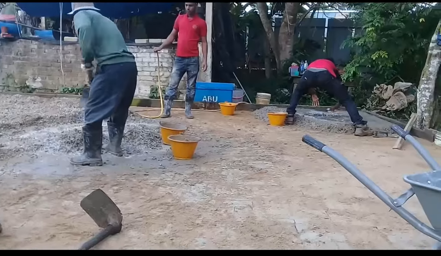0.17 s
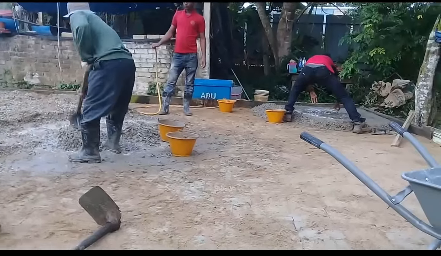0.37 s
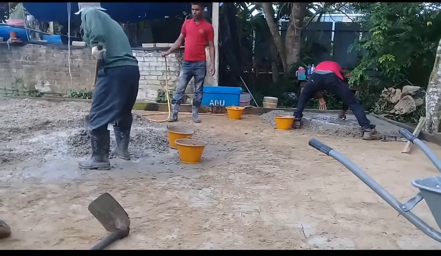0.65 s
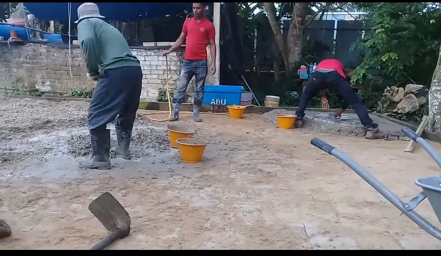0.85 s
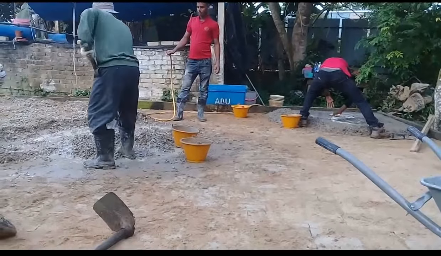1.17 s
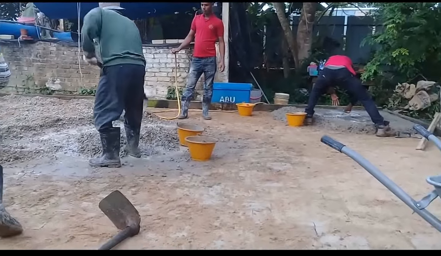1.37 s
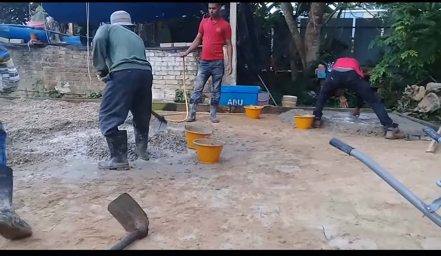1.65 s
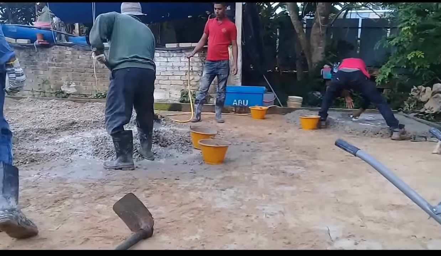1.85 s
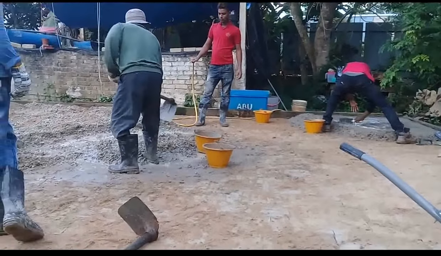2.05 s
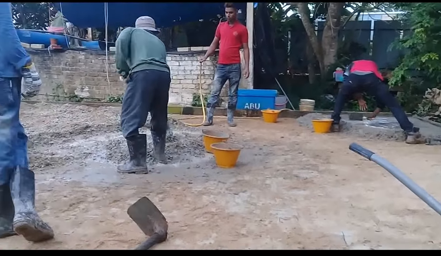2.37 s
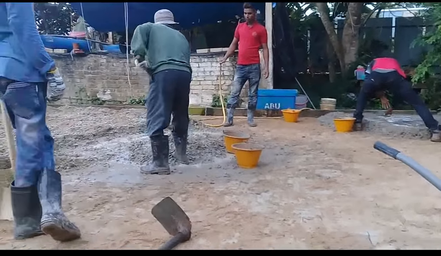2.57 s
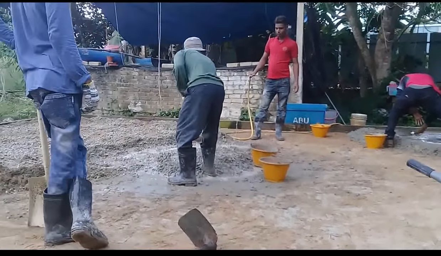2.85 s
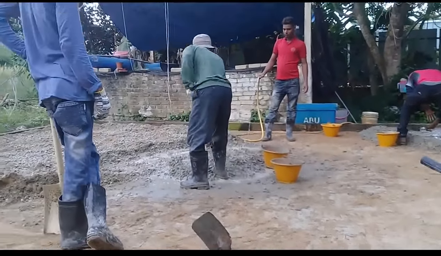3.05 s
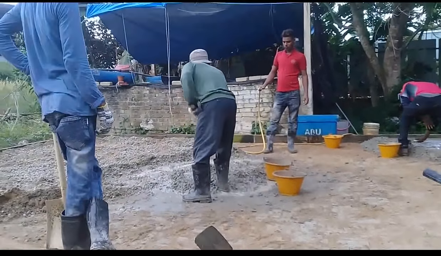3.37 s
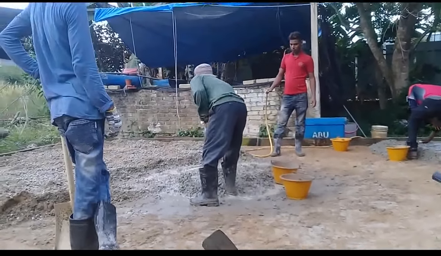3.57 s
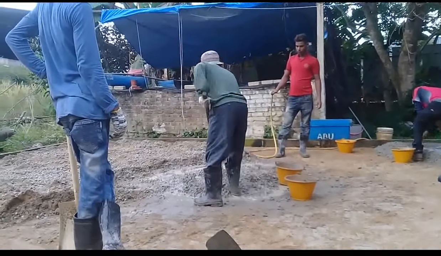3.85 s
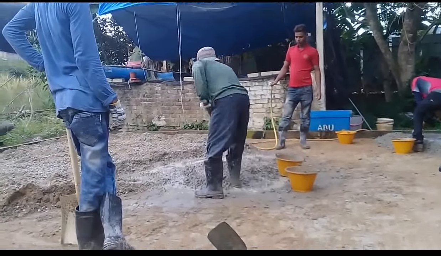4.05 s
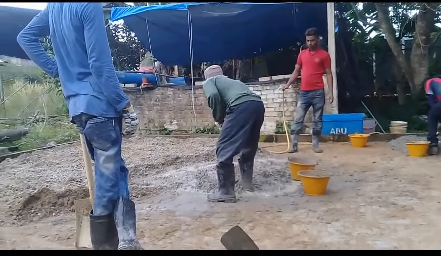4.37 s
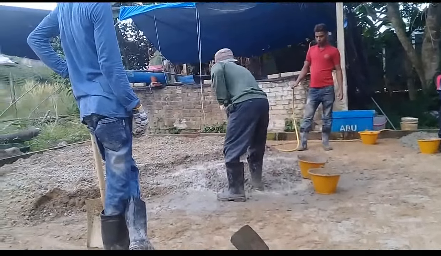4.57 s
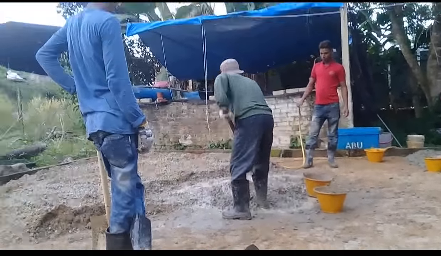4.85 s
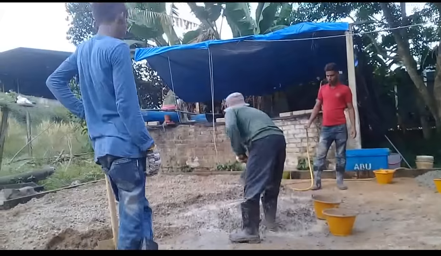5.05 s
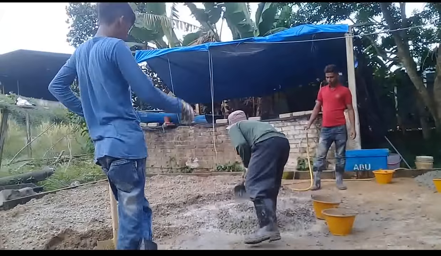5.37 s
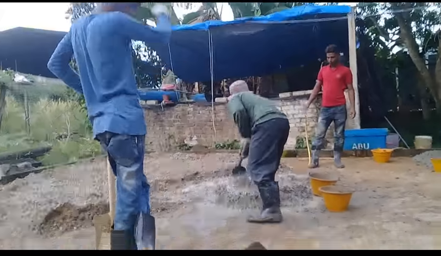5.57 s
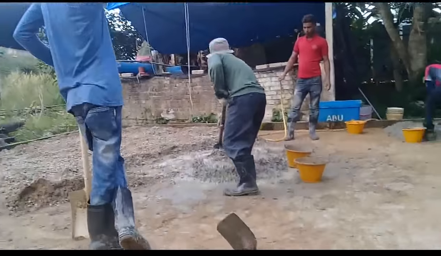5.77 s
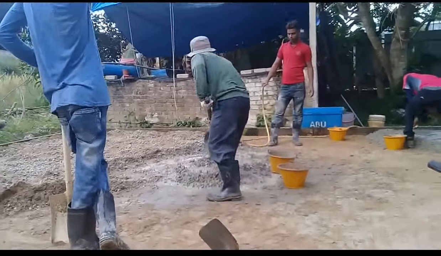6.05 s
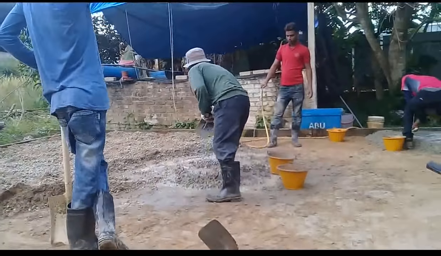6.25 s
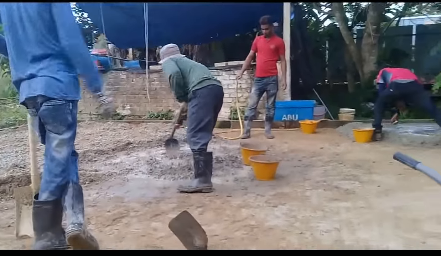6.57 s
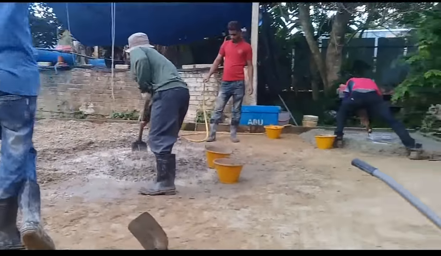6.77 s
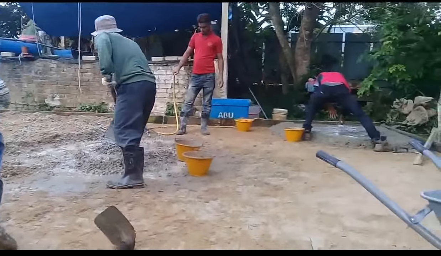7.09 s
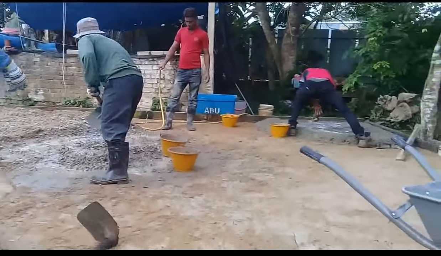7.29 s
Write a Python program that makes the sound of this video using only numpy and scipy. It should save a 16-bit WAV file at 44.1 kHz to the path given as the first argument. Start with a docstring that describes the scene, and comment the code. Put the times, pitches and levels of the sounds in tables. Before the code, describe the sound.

Repeated shovel strokes crunch, rasp and clink through a wet gravel and cement mix over a low outdoor rumble.

```python
"""Shovelling wet gravel in a yard

A labourer turns gravel and cement on a slab, a few metres from the microphone. The steel shovel chops
into the heap, crushes and pushes stones, then drags back with the bare blade rasping and clinking.
The open yard answers briefly; a low outdoor rumble lies underneath."""
import sys
import numpy as np
from scipy import signal
from scipy.fft import rfft, irfft, next_fast_len
from scipy.io import wavfile
from scipy.ndimage import uniform_filter1d

SR = 44100
rng = np.random.default_rng(int(sys.argv[2]) if len(sys.argv) > 2 else 0)


def unload_wav(signal):
    """Save mono or channel-first audio to the path in sys.argv[1] as 16-bit WAV at rate SR, clipped to [-1, 1]."""
    wavfile.write(
        sys.argv[1],
        SR,
        np.round(np.clip(np.atleast_2d(signal).T, -1, 1) * 32767).astype(np.int16),
    )


N = 327222
T = np.arange(N) / SR


def amp(db):
    """Decibels to gain."""
    return 10 ** (np.asarray(db) / 20)


def unit(x):
    """Scale to rms 1."""
    return x / np.sqrt(np.mean(x ** 2) + 1e-18)


def colour(x, points):
    """Filter with a smooth (Hz, dB) response."""
    hz, db = np.transpose(points)
    size = next_fast_len(len(x) + SR // 10)
    bins_hz = np.arange(size // 2 + 1) * SR / size
    response = amp(np.interp(np.log(bins_hz + 1), np.log(hz), db))
    return irfft(rfft(x, size) * response, size)[:len(x)]


def band_rms(x, band_hz):
    """Strength of x between two frequencies."""
    return np.std(signal.sosfilt(signal.butter(4, band_hz, "band", fs=SR, output="sos"), x))


def highpass(x, hz):
    """Roll off the bass below hz."""
    return signal.sosfilt(signal.butter(2, hz, "high", fs=SR, output="sos"), x)


def add(out, start, sound):
    """Mix a sound in at a start time in seconds."""
    i = int(start * SR)
    out[i:i + len(sound)] += sound[:max(N - i, 0)]


def ringing(hz, t60, t):
    """One decaying mode."""
    return np.sin(2 * np.pi * hz * t) * np.exp(-np.log(1000) * t / t60)


def clicks(rate, spread_db):
    """Random contacts, rate a second: many faint, a few strong."""
    chance, size, side = rng.random((3, N))
    strength = np.minimum(-np.log(size + 1e-12), 5)
    return (chance < rate / SR) * np.sign(side - .5) * amp(spread_db * strength)


def wander(rate_hz):
    """Smooth random drift with rms 1."""
    hold = max(int(SR / rate_hz), 1)
    steps = rng.standard_normal(N)[np.arange(N) // hold]
    return unit(uniform_filter1d(steps, hold))


# The open air around the yard. Each row: frequency in Hz, relative level in dB.
RUMBLE_SPECTRUM = [(20, -47.5), (32, -16.5), (48, -2.5), (85, 1), (120, -2), (160, -7), (230, -8),
                   (400, -16.5), (800, -16), (2000, -20), (8000, -27)]
def outdoor_rumble():
    """Distant rumble that swells a little."""
    level_db = -48.5 + .7 * wander(6)
    return amp(level_db) * unit(colour(rng.standard_normal(N), RUMBLE_SPECTRUM))


# A motor far from the microphone. Each row: harmonic number, level in dB.
MOTOR_HARMONICS = [(1, -48.5), (2, -54)]
def far_motor(hum_hz=79.4):
    """A low hum, heard for about a second near the start."""
    hum = sum(amp(db) * np.sin(2 * np.pi * k * hum_hz * T) for k, db in MOTOR_HARMONICS)
    return hum * np.interp(T, [.3, .42, 1.0, 1.25], [0, 1, 1, 0])


def yard(direct, tail_db, t60):
    """A thin, short scatter from wall and trees reaches the microphone; its bass is lost in the open."""
    t = T[:SR // 2]
    envelope = np.exp(-np.log(1000) * t / t60) * np.minimum(t / 0.0081, 1)
    tail = highpass(rng.standard_normal(len(t)) * envelope, 400)
    return direct + amp(tail_db) * signal.fftconvolve(direct, tail / np.linalg.norm(tail))[:N]


# Slab and handle under a blow. Each row: multiple of the lowest mode, relative level in dB.
SLAB_MODES = [(1, -2.5), (1.33, -7.5), (2.2, -8), (3.6, -6), (4.45, -9)]
# Blows on the slab. Each row: start in seconds, gain in dB, lowest mode in Hz, its t60 in seconds.
THUDS = [(0.263, -33.5, 325, 0.057), (0.472, -34, 368, 0.17), (1.119, -28, 330, 0.18),
         (2.441, -27.5, 231, 0.14), (6.550, -11.5, 149.4, 0.087)]
def thumping():
    """The blade bottoms out and knocks on the slab, cushioned by the mix."""
    out, t = np.zeros(N), T[:SR // 3]
    for start, db, hz, t60 in THUDS:
        knock = sum((-1) ** k * amp(mode_db) * ringing(ratio * hz, t60 / ratio ** 0.32, t)
                    for k, (ratio, mode_db) in enumerate(SLAB_MODES))
        add(out, start, amp(db) * knock * np.minimum(t / 0.0089, 1))
    return highpass(out, 110)


# The emptied blade sings along the slab. Each row: start and length in seconds,
# the low mode's level in dB and pitch in Hz, then the same for the high mode.
DRAGS = [(2.043, 0.3, -45, 1560, -52.5, 6740), (3.323, 0.054, -42, 1600, -46, 6000),
         (4.19, 0.3, -46.5, 1790, -67, 6000), (4.633, 0.079, -40, 1710, -44.5, 4360),
         (5.006, 0.046, -45, 2460, -48, 5930), (5.117, 0.092, -50.5, 1530, -53.5, 5860),
         (5.315, 0.047, -49, 2400, -48.5, 5940)]
def dragging(low_t60=.013, high_t60=.005):
    """Uneven slips of the edge keep two heavily damped blade modes sounding."""
    out, t = np.zeros(N), T[:SR // 40]
    slips = clicks(rate=910, spread_db=1.5)
    for start, length, low_db, low_hz, high_db, high_hz in DRAGS:
        drag = slips[int(start * SR):int((start + length) * SR)]
        pressure = signal.windows.tukey(len(drag), .5)
        for db, hz, t60 in ((low_db, low_hz, low_t60), (high_db, high_hz, high_t60)):
            mode = signal.fftconvolve(drag * pressure, ringing(hz, t60, t))
            add(out, start, amp(db) * unit(mode))
    return out


# Steel damped by wet mix. Each row: frequency in Hz, relative level in dB, base t60 in seconds.
BLADE_MODES = [(670, 4, 0.043), (1388, -2.5, 0.057), (1577, 5, 0.089), (2062, 1.5, 0.095),
               (2146, 3.5, 0.12), (2503, -9.5, 0.17), (3770, -7.5, 0.12), (3950, 0.5, 0.11),
               (4280, -2.5, 0.052), (4860, -7.5, 0.08), (5260, -6.5, 0.11), (5640, -2.5, 0.088),
               (6250, -3, 0.22), (6050, -13.5, 0.1), (7600, -6, 0.047), (7520, -7.5, 0.17),
               (7730, -1.5, 0.21)]
def blade(ring_hz, t60_scale, focus_db, attack_s, detune=.004):
    """The contact point favours modes near ring_hz; clinging mix detunes them; buried steel dies sooner."""
    t, out = T[:SR // 3], 0
    for hz, db, t60 in BLADE_MODES:
        scatter_db, side, load = rng.standard_normal(3)
        nearness = np.exp(-(np.log2(hz / ring_hz) / .1) ** 2)
        gain = np.sign(side) * amp(db + focus_db * nearness + scatter_db)
        out = out + gain * ringing(hz * (1 + detune * load), t60 * t60_scale, t)
    return out / np.std(out[:SR // 100]) * np.minimum(t / attack_s, 1)


def skid(decay_s):
    """A short burst of steel slipping over grit."""
    t = T[:SR // 4]
    return rng.standard_normal(len(t)) * np.exp(-t / decay_s)


# Bare steel on stones. Each row: start in seconds, skid gain in dB, skid decay in seconds,
# ring gain in dB, favoured ring pitch in Hz.
CLINKS = [(1.452, -43, 0.0045, -37, 4180), (2.017, -32, 0.0023, -32, 1580),
          (2.051, -34, 0.002, -30.5, 1380), (2.093, -28, .0015, -41, 7100), (2.222, -27, 0.0012, -34, 1370),
          (2.251, -36, 0.0012, -37.5, 1570), (2.311, -38, 0.0013, -35, 1560),
          (2.833, -32, 0.043, -44, 2470), (2.961, -32, 0.015, -28.5, 1655),
          (3.332, -38.5, 0.072, -42, 6230), (4.021, -20, 0.00065, -60, 5280),
          (4.059, -34, 0.002, -44, 5740), (4.191, -28, 0.042, -28, 1570), (4.69, -43, 0.0058, -32.5, 1580),
          (4.803, -26, 0.029, -39, 4270), (4.883, -36, 0.1, -40, 2420), (5.003, -37, 0.035, -34.5, 2430),
          (6.275, -31.5, 0.053, -32.5, 4370), (7.411, -25, 0.025, -32.5, 7220)]
def clinking():
    """Light touches of the bare blade: a bright skid over its short ring."""
    skids, steel = np.zeros((2, N))
    for start, skid_db, decay, ring_db, ring_hz in CLINKS:
        add(skids, start, amp(skid_db) * skid(decay))
        add(steel, start, amp(ring_db) * blade(ring_hz, t60_scale=0.47, focus_db=20.5, attack_s=0.0013))
    skid_spectrum = [(200, -29), (900, -7.5), (1600, 1), (2450, 4.5), (3100, -4.5),
                     (4200, 4.5), (5200, 4), (6100, 1), (8000, -4)]
    return steel + colour(skids, skid_spectrum)


def gravel(rate, spread_db, cycles, pebble_db, sizes=20):
    """Dry cracks plus pebbles of many sizes, each ticking briefly at its own pitch."""
    pebbles = 0
    for hz in np.linspace(450, 8000, sizes):
        tick = ringing(hz, cycles / np.sqrt(hz * 1000), T[:SR // 20])  # cycles as counted at 1 kHz
        contacts = clicks(rate / sizes, spread_db)
        pebbles = pebbles + unit(signal.oaconvolve(contacts, tick)[:N])
    cracks = unit(clicks(rate, spread_db))
    return unit(cracks + amp(pebble_db) * unit(pebbles))


# Stones shifting in the heap, steel rasping on the slab, sand under the edge.
# Each row: frequency in Hz, relative level in dB.
HEAP_SPECTRUM = [(60, -21), (150, -1), (240, -3.5), (320, 1.5), (440, -7), (650, 6.5), (950, 0),
                 (1300, -11), (2000, -16.5), (3200, -20.5), (3950, -14), (4400, -17), (5400, -16),
                 (8000, -49.5)]
RASP_SPECTRUM = [(300, -32), (800, -14), (1200, 1), (1550, 1), (2150, 1.5), (2550, -6), (3000, -13),
                 (4000, -24), (8000, -44)]
GRIT_SPECTRUM = [(800, -19.5), (2300, -7.5), (2900, -3), (3500, 1), (4150, 9), (5000, 2), (5900, 1.5),
                 (7200, 3), (8000, 0)]
def shovel_load(stones, heap, rasp, grit):
    """One stream of stone contacts sounds through the heap, the blade face and the sandy edge."""
    out = 0
    for force, spectrum, band_hz in ((heap, HEAP_SPECTRUM, (400, 1000)),
                                     (rasp, RASP_SPECTRUM, (1100, 2600)),
                                     (grit, GRIT_SPECTRUM, (5000, 8000))):
        out = out + colour(stones * force, spectrum) / band_rms(colour(stones, spectrum), band_hz)
    return out


def stroke(start, length, attack_s, release_s, sag_db_per_s=0):
    """Force of one movement: it builds up, sags while it lasts and dies away."""
    out, t = np.zeros(N), T[:2 * SR]
    rise = np.minimum(t / attack_s, 1)
    held = amp(-sag_db_per_s * np.minimum(t, length))
    fall = np.exp(-np.maximum(t - length, 0) / release_s)
    add(out, start, rise * held * fall)
    return out


# The blade is shoved on through the heap, slowing as the load builds.
# Each row: start and length in seconds, then heap, rasp and grit gains in dB.
PUSHES = [(0.54, 0.079, -38.5, -38.5, -46), (1.111, 0.1, -34, -34.5, -48),
          (1.748, 0.072, -35.5, -33.5, -40), (2.373, 0.12, -36.5, -39, -46),
          (3.049, 0.071, -37, -38.5, -45), (3.662, 0.17, -37.5, -34, -40.5), (4.437, 0.14, -34, -32.5, -38),
          (4.656, 0.11, -41.5, -40.5, -50), (5.474, 0.22, -35, -32, -36.5),
          (5.735, 0.23, -39.5, -37.5, -40.5), (6.561, 0.23, -41, -39.5, -39),
          (6.794, 0.21, -38.5, -38.5, -38)]
# Light passes over the slab. Each row: start and length in seconds, rasp and grit gains in dB.
SCRAPES = [(0.23, 0.28, -48.5, -68), (0.655, 0.22, -39.5, -48), (0.797, 0.25, -38, -47),
           (1.344, 0.12, -45.5, -55), (1.408, 0.034, -37, -51), (1.882, 0.19, -34.5, -46),
           (2.105, 0.027, -35.5, -56), (2.552, 0.24, -43.5, -52.5), (3.18, 0.15, -41.5, -53.5),
           (3.302, 0.089, -39.5, -52.5), (3.517, 0.15, -44, -55.5), (3.831, 0.17, -35.5, -44.5),
           (4.033, 0.099, -56.5, -53), (4.264, 0.27, -43, -42.5), (4.76, 0.14, -49.5, -45),
           (4.985, 0.026, -38, -43), (5.138, 0.084, -43, -46.5), (5.28, 0.19, -45.5, -48),
           (5.995, 0.059, -39, -41.5), (6.40, 0.088, -48, -51.5)]
# A stone catches and gives way. Each row: start in seconds, change of force in dB.
CRUNCHES = [(0.591, 6.5), (1.812, 0), (2.47, -4), (3.099, 7), (3.796, 4.5), (3.965, 2.5), (4.457, -0.5),
            (4.584, 5), (4.665, -1), (5.495, -1.5), (5.533, 3.5), (5.596, 3.5), (5.791, 5.5), (5.875, 4.5),
            (6.825, 1), (6.879, 3)]
def scraping():
    """The blade sticks and slips through the mix: heavy pushes, light scrapes, settling stones."""
    power, settling = np.zeros((3, N)), np.zeros(N)  # power has a row each for heap, rasp and grit
    for start, length, *mix_db in PUSHES:
        push = stroke(start, length, attack_s=0.021, release_s=0.064, sag_db_per_s=12)
        power += (amp(mix_db)[:, None] * push) ** 2
        loose_stones = stroke(start, length, attack_s=0.021, release_s=0.83, sag_db_per_s=12)
        settling = np.maximum(settling, loose_stones)
    for start, length, rasp_db, grit_db in SCRAPES:
        mix_db = [rasp_db - 15.5, rasp_db, grit_db]  # a light stroke hardly moves the heap
        scrape = stroke(start, length, attack_s=0.03, release_s=0.059, sag_db_per_s=13.5)
        power += (amp(mix_db)[:, None] * scrape) ** 2
    settling *= amp(-0.7 * wander(5.5))
    power += (amp([-55, -48, -51.5])[:, None] * settling) ** 2
    surge_db = sum(db * stroke(start, length=0.0077, attack_s=.004, release_s=.012)
                   for start, db in CRUNCHES)
    stick_slip_db = 1.1 * wander(70)
    forces = np.sqrt(power) * amp(surge_db + stick_slip_db)
    stones = gravel(rate=3200, spread_db=2.5, cycles=10.1, pebble_db=-2.5)
    return amp(-3) * shovel_load(stones, *forces)


# The blade bites into the heap, a few metres from the microphone. Each row: start in seconds,
# heap, rasp and grit gains in dB, sinking time and decay in seconds, crack and ring gains in dB,
# favoured ring pitch in Hz, factor on the ring time.
CHOPS = [(0.463, -28, -25, -26.5, 0.044, 0.034, -24, -26.5, 3950, 1.6),
         (1.06, -26.5, -29.5, -32, 0.056, 0.051, -24, -38, 4280, 1.1),
         (1.703, -27.5, -19.5, -22, 0.0066, 0.063, -12.5, -19, 4300, 1.8),
         (2.347, -26.5, -25, -25, 0.0056, 0.047, -18.5, -18.5, 2100, 0.24),
         (2.984, -24.5, -24, -27, 0.0057, 0.054, -21, -22.5, 2140, 0.62),
         (3.647, -30, -27, -28.5, 0.011, 0.026, -44.5, -28, 3950, 0.6),
         (4.382, -39.5, -30, -35, 0.0025, 0.027, -22, -31, 4000, 0.97),
         (5.391, -28, -32, -28, 0.01, 0.014, -28, -27.5, 2130, 2.3),
         (6.547, -27.5, -28.5, -21, 0.011, 0.0086, -18.5, -27, 6450, 1.1)]
def chopping():
    """A crack on contact, a crush of stones while the blade sinks, and a ring of steel."""
    forces, steel, cracks = np.zeros((3, N)), np.zeros(N), np.zeros(N)
    for start, *mix_db, sink, decay, crack_db, ring_db, ring_hz, t60_scale in CHOPS:
        rise = 0.00215 + .08 * sink  # a deeper bite starts more softly
        crush = np.clip((T - start) / rise, 0, 1) * np.exp(-np.maximum(T - start - sink, 0) / decay)
        forces += amp(mix_db)[:, None] * crush
        contact = start + rise / 2
        add(cracks, contact, amp(crack_db) * skid(decay_s=0.0077))
        add(steel, contact, amp(ring_db) * blade(ring_hz, t60_scale, focus_db=15.5, attack_s=0.0056))
    stones = gravel(rate=9000, spread_db=2, cycles=9.4, pebble_db=11)
    crack_spectrum = [(150, -35.5), (650, -10.5), (2100, -4), (3000, -7),
                      (4100, 12.5), (6000, -1.5), (8000, 2.5)]
    return amp(-4) * shovel_load(stones, *forces) + steel + colour(cracks, crack_spectrum)


def scene():
    """One microphone in the yard hears the shovel work over the distant background."""
    work = scraping() + chopping() + clinking() + dragging() + thumping()
    return (yard(work, tail_db=-11.5, t60=0.45) + outdoor_rumble() + far_motor())[None]


def record(dry, silence_s=.21, top_hz=8050):
    """The microphone signal fades in after a moment of silence; the top is cut steeply."""
    fade = np.clip((T - silence_s) / .05, 0, 1) ** 2
    return signal.sosfilt(signal.ellip(12, .2, 70, top_hz, fs=SR, output="sos"), dry * fade)


dry = scene()
out = record(dry)
unload_wav(out)
```